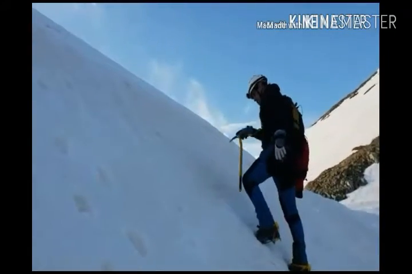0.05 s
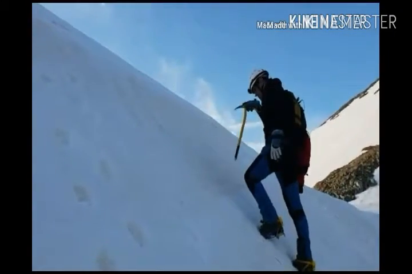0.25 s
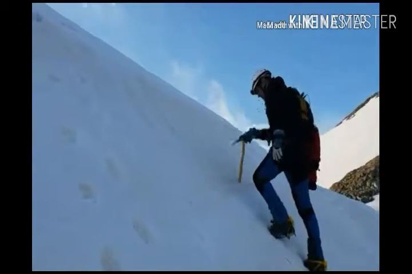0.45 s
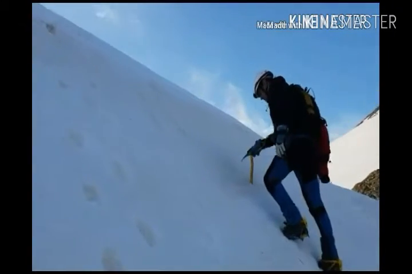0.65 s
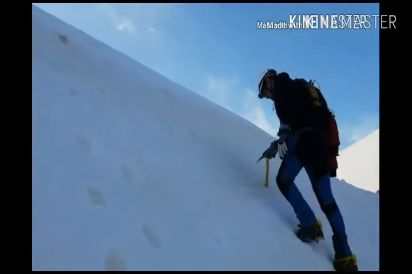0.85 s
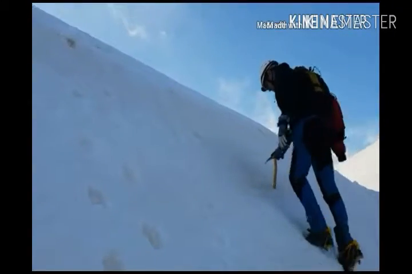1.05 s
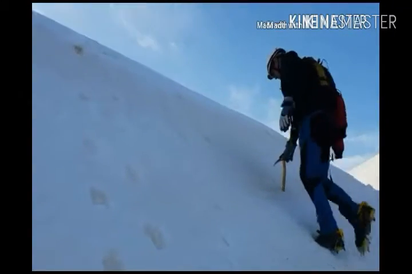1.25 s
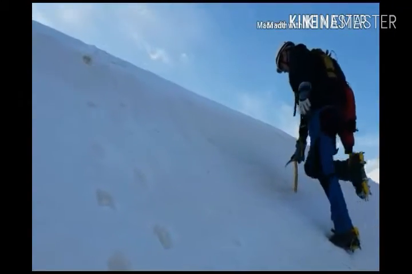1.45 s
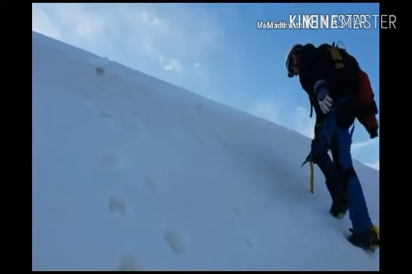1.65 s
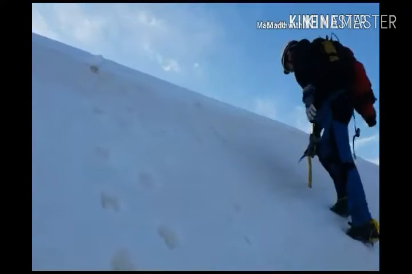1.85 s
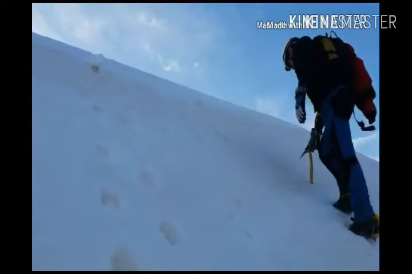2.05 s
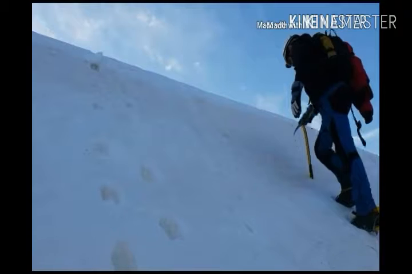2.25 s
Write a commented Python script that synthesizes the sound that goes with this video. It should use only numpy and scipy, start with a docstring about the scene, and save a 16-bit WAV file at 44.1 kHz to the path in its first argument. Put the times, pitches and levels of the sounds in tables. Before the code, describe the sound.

Crampons crunch and scrape on firm snow as a climber steps upward. A few short metal clacks from spikes and an ice axe come early, then softer rubbing, crust snaps and dull steps. Wind lightly buffets the close microphone.

```python
"""On an open slope of firm snow, a climber moves upward. Gritty rubbing, like a glove or sleeve close
to the microphone, has a dull body, a crunch and a fine hiss. Crampons (boot spikes) and an axe clack
with short rings that the snow damps, and bits of crust snap. Steps, knocks and a pop of wind thud softly.
Wind buffets the two microphone ports separately; the open slope gives no echo."""
import sys
import numpy as np
from scipy import signal
from scipy.fft import rfft, irfft
from scipy.io import wavfile

SR = 44100
rng = np.random.default_rng(int(sys.argv[2]) if len(sys.argv) > 2 else 0)


def to_wav(s):
    """Save 16-bit WAV."""
    ch = np.atleast_2d(s).T  # columns
    pcm = np.round(np.clip(ch, -1, 1) * 32767)  # PCM
    wavfile.write(sys.argv[1], SR, pcm.astype(np.int16))


N = 105840  # 2.4 seconds

SLIP_HZ, BODY_ROUGH_DB, HISS_ROUGH_DB = 169.6, 2, 1.9  # how fast and how much the rubbing jerks
FLICKER_HZ, FLICKER_DB = 890.4, 1.5
GRIT_PER_S, GRIT_SPREAD_DB, GRIT_DB = 320, 2, -9
RELEASE_S, CRUNCH_RING_DB = 0.013, -15.5
BODY_LIKENESS, CRUNCH_LIKENESS = 0.85, 0.047  # 1 means the same in both ears, 0 unrelated
# The tone of a rub's three parts. Each row: frequency in Hz, relative level in dB.
BODY_TONE = [(60, -8.5), (150, 0.5), (300, 1), (550, 2), (850, 3), (1200, 2), (1800, -7), (3000, -38),
             (6000, -18)]
CRUNCH_TONE = [(400, -30.5), (900, -26), (1400, 1), (1800, 6.5), (2400, 4.5), (3000, 3), (3600, 5),
               (4400, 4.5), (5200, 0.5), (7000, -7), (10000, -28), (16000, 0.5)]
HISS_TONE = [(1000, -45), (3000, -46), (5500, -1), (7500, 3), (9500, -2), (12000, 3.5), (15000, -2.5),
             (17000, 1)]
# Rubs and scrapes. Each row: start, length and rise time in seconds, fade over the length in dB,
# levels of body, crunch and hiss in dB, pan of the crunch (left minus right) in dB.
RUBS = [ (0.139, 0.08, 0.0049, -1, -51.5, -44, -46.5, -9),
        (0.228, 0.05, 0.019, 4, -37.5, -28.5, -28.5, -9.5), (0.271, 0.076, 0.0055, 3, -38.5, -33, -31, -4),
        (0.34, 0.08, .005, 3.5, -54.5, -42, -42, -7), (0.437, 0.079, .01, 1.5, -75, -59, -55, -6),
        (0.5264, 0.014, 0.0064, 3.5, -47.5, -26.5, -26, -2.5),
        (0.556, 0.057, 0.0051, 6.5, -52.5, -31, -34, -1.5),
        (0.634, 0.092, 0.0058, 6.5, -49, -42.5, -42.5, -7), (0.721, 0.19, 0.0037, 8.5, -53, -43.5, -46, -8),
        (0.863, 0.16, 0.0037, 0.5, -53, -45, -44, -7), (0.947, 0.13, 0.03, 2.5, -42, -39.5, -43, -5),
        (1.082, 0.048, 0.018, 7, -37.5, -34, -38.5, -6.5), (1.13, 0.13, .005, 1.5, -52.5, -50.5, -51, -4),
        (1.197, 0.028, 0.0064, 1.5, -42, -38.5, -38, -6), (1.253, 0.039, .004, -0.5, -48, -41, -41, -7),
        (1.293, 0.17, 0.018, 4.5, -49.5, -44, -46.5, -7),
        (1.468, 0.015, 0.0027, 1.5, -43.5, -29, -33.5, -16),
        (1.489, 0.036, 0.0047, -2.5, -46.5, -38, -38.5, -4),
        (1.537, 0.15, 0.0024, 5.5, -43.5, -36, -39.5, -5.5),
        (1.708, 0.027, 0.0074, -0.5, -40, -35.5, -33.5, -3.5),
        (1.739, 0.073, 0.0046, 8, -44, -40.5, -37.5, -3.5), (1.799, 0.078, 0.011, 6, -41, -39.5, -39, -4.5),
        (1.916, 0.068, 0.014, 0.5, -54, -45, -51.5, -19), (2.002, 0.077, 0.0071, 15.5, -50.5, -51, -68, -6),
        (2.153, 0.16, 0.024, 3.5, -69.5, -52.5, -51, -8)]


def rubbing(t):
    """Gritty, jerky rubbing close to the microphone, like a glove or sleeve, with a faint metal ring."""
    body_power = crunch_power = hiss_power = 0
    for start, length, rise, fade_db, body_db, crunch_db, hiss_db, pan_db in RUBS:
        age = np.maximum(t - start, 0)
        fade = undb(-fade_db * np.minimum(age / length, 1))
        release = np.exp(-np.maximum(age - length, 0) / RELEASE_S)
        envelope = np.minimum(age / rise, 1) * fade * release
        body_power += (undb(body_db) * envelope) ** 2
        crunch_power += (undb(crunch_db) * envelope * pan(pan_db)) ** 2
        hiss_power += (undb(hiss_db) * envelope) ** 2
    slip = wobble(SLIP_HZ)
    flicker = unit(undb(FLICKER_DB * wobble(FLICKER_HZ)))
    friction = crackle(CRUNCH_LIKENESS) * flicker
    grit = (rng.random(N) < GRIT_PER_S / SR) * undb(GRIT_SPREAD_DB * rng.standard_normal(N))
    friction += undb(GRIT_DB) * unit(grit * rng.standard_normal((2, N)))
    crunch = colour(friction * np.sqrt(crunch_power), CRUNCH_TONE)
    ring = unit(ringing(crackle(CRUNCH_LIKENESS), CRAMPON_MODES))
    steel = undb(CRUNCH_RING_DB) * ring * np.sqrt(crunch_power)
    body = crackle(BODY_LIKENESS) * np.sqrt(body_power) * flicker * undb(BODY_ROUGH_DB * slip)
    hiss = crackle(likeness=0) * np.sqrt(hiss_power) * undb(HISS_ROUGH_DB * slip)
    return colour(body, BODY_TONE) + crunch + steel + colour(hiss, HISS_TONE) * pan(db=-0.5)


def crackle(likeness, per_second=14000, spread_db=3.5):
    """Dense tiny clicks of uneven size; likeness is the share both ears hear."""
    shape = (3, N)  # shared, left, right
    happens = rng.random(shape) < per_second / SR
    size = undb(spread_db * np.minimum(rng.exponential(size=shape), 6))
    clicks = unit(happens * size * np.sign(rng.standard_normal(shape)))
    return np.sqrt(likeness) * clicks[0] + np.sqrt(1 - likeness) * clicks[1:]


def ringing(push, modes):
    """Pushed metal rings at its own frequencies, called modes."""
    return sum(undb(db) * signal.lfilter(*signal.iirpeak(hz, hz * ring_s / np.log(1000), fs=SR), push)
               for hz, db, ring_s in modes)


DAMP_S, FREE_SHARE, MUTE_S = 0.0032, 0.49, 0.026  # snow damps the ring fast, then mutes the share left
MAIN_MODE_HZ, CHATTER_HZ, CHATTER_DB = 3550, 450, 2.5
CRACK_DB, CRACK_S = -11, 0.0042
DETUNE = 0.003  # each contact loads the metal differently, shifting its modes by about this share
# The tone of the crack on contact. Each row: frequency in Hz, relative level in dB.
CRACK_TONE = [(200, -36), (900, -10.5), (1800, -2.5), (4000, -1), (5900, -6), (6700, -6), (7600, -7),
              (12000, -9.5), (16000, -17)]
# How the crampon, the axe and the axe's spike ring.
# Each row: frequency in Hz, relative level in dB, seconds to fade by 60 dB when ringing freely.
CRAMPON_MODES = [(670, -27.5, .12), (1115, -17, .099), (1530, -12, .06), (1990, -9, .09), (2400, -4, .11),
                 (2700, -8, .04), (3200, -6, .045), (3440, 2, .05), (3595, 4, .055), (4170, -2, .05),
                 (4310, -6, .055), (4490, -1, .06), (5720, -7, .035), (5940, -9, .035)]
AXE_MODES = [(666, -29, .14), (1102, -15, .1), (1730, 0, .055), (2085, -2, .07), (2300, -5, .06),
             (2800, -4, .046), (3470, -3, .035), (3590, 1, .05), (4300, -9, .05), (4495, 0, .075),
             (4588, 3, .07), (5700, -10, .05), (6090, -13, .045)]
SPIKE_MODES = [(1635, -10, .03), (2280, -6, .05), (2780, -8, .03), (3605, 4, .028), (4502, -16, .15),
               (5720, -13, .025), (6735, -10, .035)]
# When each one strikes. Each row: start in seconds, level in dB, rise time in seconds,
# treble tilt and focus on the main mode (both in dB per octave), pan in dB.
CRAMPON_HITS = [(.6025, -14, 0.0024, 6.5, 1, -3.5), (.6103, -14.5, 0.00095, -0.5, 4, -3.5),
                (.616, -14.5, 0.0031, -1, -1.5, -2), (1.4163, -33.5, .00087, -4, 0, -13)]
AXE_HITS = [(.7248, -27, 0.00056, 5.5, -10, 3), (.7268, -16.5, 0.0016, 6.5, 0, -10.5),
            (.738, -13.5, 0.0018, -8.5, 2, -0.5), (.882, -31.5, 0.0015, 1.5, -8.5, -11)]
SPIKE_HITS = [(.4597, -26.5, .0006, 5.5, -10, -8.5), (.4642, -19, 0.00063, -13, 20, -8)]


def metal_clacks(hits, modes):
    """Each contact makes a crack and rings the metal, which the snow quickly damps."""
    out = np.zeros((2, N))
    age = np.arange(SR // 10) / SR
    hz, mode_db, ring_s = np.array(modes, float).T[:, :, None]
    octaves_from_main = np.abs(np.log2(hz / MAIN_MODE_HZ))
    for start, db, rise, tilt_db, focus_db, pan_db in hits:
        gain = undb(mode_db + tilt_db * np.log2(hz) - focus_db * octaves_from_main)
        gain = gain / np.sqrt(np.sum(gain ** 2)) * np.exp(-np.log(1000) * age / ring_s)
        shifted_hz = hz * (1 + DETUNE * rng.standard_normal(hz.shape))
        phase = 2 * np.pi * (shifted_hz * age + rng.random((2, len(hz), 1)))
        onset = np.minimum(age / rise, 1)
        after = np.maximum(age - rise, 0)
        damping = FREE_SHARE + (1 - FREE_SHARE) * np.exp(-after / DAMP_S)
        envelope = onset * damping * np.exp(-(after / MUTE_S) ** 2)
        chatter = undb(CHATTER_DB * wobble(CHATTER_HZ)[:len(age)])
        strength = np.sqrt(np.mean(np.sum(gain ** 2, axis=0) * envelope ** 2))
        ring = strength * unit(np.sum(gain * np.sin(phase), axis=1) * envelope * chatter)
        noise = colour(rng.standard_normal((2, len(age))), CRACK_TONE)
        crack = noise * undb(CRACK_DB) * onset * np.exp(-after / CRACK_S)
        add(out, start, (ring + crack) * undb(db) * pan(pan_db))
    return out


# The tone of breaking crust. Each row: frequency in Hz, relative level in dB.
SNAP_TONE = [(150, -35.5), (700, -11), (1700, 3.5), (2800, 2.5), (3800, 7), (5500, -6), (8000, -2),
             (12000, -2.5), (16000, 1)]
# Snaps. Each row: start in seconds, level in dB, fade time in seconds, treble tilt in dB per octave.
SNAPS = [(.249, -25.5, 0.0057, -3), (.269, -23.5, .002, -7), (0.2747, -22, 0.0017, -6),
         (0.2825, -25, 0.0018, -8.5), (0.3068, -26, 0.0019, -4), (0.3162, -23.5, .001, -6),
         (0.3238, -25, 0.0016, -3), (0.341, -28, 0.00083, -7), (.3955, -27.5, 0.0016, 3),
         (0.4066, -27, 0.00077, 0.5), (.662, -29.5, 0.0016, -2), (0.7147, -29.5, .0012, -4),
         (0.8314, -30.5, 0.00089, 2), (0.872, -22.5, 0.0016, 3), (0.883, -41, 0.0037, 1),
         (.962, -34, 0.0015, -1), (1.095, -33, 0.0011, 0), (1.132, -34, 0.0012, -4),
         (1.26, -30.5, 0.0016, 1.5), (1.286, -28.5, 0.0011, -6), (1.4738, -18, .0007, -1),
         (1.482, -21.5, 0.00052, -2.5), (1.514, -27.5, 0.005, -0.5), (1.7139, -26.5, .0016, -3.5),
         (1.8087, -33, 0.0011, -5), (1.926, -34, 0.0022, -0.5), (1.9595, -27, 0.0016, -0.5),
         (1.975, -25, 0.0017, 1.5), (1.9843, -24.5, 0.00097, 0), (2.0254, -27, .0041, 0.5),
         (2.05, -35.5, 0.0025, 0), (2.064, -33.5, 0.0023, -0.5), (2.3813, -27.5, 0.00044, 2.5),
         (2.392, -35.5, 0.02, -1)]


def crust_snaps():
    """Single pieces of crust break in tiny bursts; thick ones sound duller."""
    out = np.zeros((2, N))
    age = np.arange(SR // 10) / SR
    for start, db, decay, tilt_db in SNAPS:
        burst = undb(db) * np.exp(-age / decay) * rng.standard_normal((2, len(age)))
        tone = [(hz, level + tilt_db * np.log2(hz)) for hz, level in SNAP_TONE]
        add(out, start, colour(burst, tone))
    return out * pan(db=-3)


# Soft thuds. Each row: start in seconds, level in dB, centre frequency in Hz, fade time in seconds.
THUDS = [(0.68, -36.5, 112, 0.0073), (0.871, -25.5, 870, 0.0032), (1.125, -36, 297, 0.01),
         (1.21, -34.5, 463, 0.011), (1.257, -24.5, 754, 0.003), (1.27, -43, 133, 0.018),
         (1.526, -34.5, 207, 0.019), (1.594, -45, 256, 0.017), (1.703, -33, 161, 0.015),
         (1.728, -43, 255, 0.013), (1.753, -35.5, 150, 0.0091), (1.846, -35.5, 140, 0.014),
         (2.28, -44, 554, 0.0054), (2.338, -41.5, 587, 0.0038)]


def soft_thuds(rise_s=0.0072, edge_db=-19):
    """Short, dull bursts of noise: boot steps, knocks and a pop of wind on the microphone."""
    out = np.zeros(N)
    age = np.arange(SR // 10) / SR
    for start, db, hz, decay in THUDS:
        band = [(hz / 4, edge_db), (hz / np.sqrt(2), 0), (hz * np.sqrt(2), 0),
                (hz * 4, edge_db), (hz * 16, -60)]
        envelope = np.minimum(age / rise_s, 1) * np.exp(-age / decay)
        thud = unit(envelope * colour(rng.standard_normal(len(age)), band))
        add(out, start, undb(db) * np.sqrt(np.mean(envelope ** 2)) * thud)
    return out


# The tone of the wind's rumble and the air's hiss. Each row: frequency in Hz, relative level in dB.
WIND_TONE = [(12, -19), (28, -3.5), (45, -5.5), (70, 0.5), (110, -5.5), (170, -18), (300, -40), (800, -69),
             (3000, -70)]
AIR_TONE = [(30, 20), (150, 3.5), (500, 1), (1200, -1.5), (3800, 0.5), (6000, -4), (12000, -2.5),
            (16000, -4.5)]
# Wind pressure on each microphone port. Each row: time in seconds, level in dB.
GUSTS_LEFT = [(0, -53.5), (.21, -58.5), (.28, -41), (.42, -48.5), (.5, -60), (.6, -43), (.65, -51),
              (.685, -33), (.73, -54), (1.03, -49.5), (1.39, -57.5), (1.455, -32.5), (1.5, -50),
              (1.72, -51), (2.02, -64), (2.2, -72), (2.3, -46), (2.4, -84)]
GUSTS_RIGHT = [(0, -82), (.3, -56), (.5, -71), (.68, -46), (.88, -61), (.96, -35.5), (1.02, -57),
               (1.39, -57), (1.5, -45), (1.57, -33), (1.62, -36), (1.66, -47.5), (1.77, -35), (1.81, -46.5),
               (1.86, -32.5), (1.91, -58), (1.952, -33.5), (2.02, -48.5), (2.17, -48), (2.4, -73)]


def wind(t, air_db=-55.5):
    """Gusts rumble on each port separately, over a faint steady hiss of air."""
    gusts = np.array([undb(np.interp(t, *np.array(port).T)) for port in (GUSTS_LEFT, GUSTS_RIGHT)])
    rumble = unit(colour(rng.standard_normal((2, N)), WIND_TONE))
    air = undb(air_db) * colour(crackle(likeness=0.31), AIR_TONE) * pan(db=-0.87)
    return gusts * rumble + air


def undb(db):
    """Turn decibels into a number to multiply by."""
    return 10 ** (np.asarray(db) / 20)


def unit(x):
    """Scale to an average power of 1."""
    return x / np.sqrt(np.mean(x ** 2, axis=-1, keepdims=True))


def pan(db):
    """Make the left side db louder than the right, keeping the total power."""
    gains = undb(np.array([[db], [-db]]) / 2)
    return gains / np.sqrt(np.mean(gains ** 2))


def colour(x, points):
    """Shape the tone along (Hz, dB) points; white noise keeps its power."""
    n = x.shape[-1]
    hz, db = np.array(points, float).T
    grid_hz = np.maximum(np.arange(n + 1) * SR / (2 * n), 1)
    gain = unit(undb(np.interp(np.log(grid_hz), np.log(hz), db)))
    # Fold the filter forward in time, so nothing sounds before its cause.
    cepstrum = irfft(np.log(gain))
    cepstrum[1:n] *= 2
    cepstrum[n + 1:] = 0
    return irfft(rfft(x, 2 * n) * np.exp(rfft(cepstrum)))[..., :n]


def wobble(rate_hz):
    """Glide between random values, with a spread of 1."""
    return unit(np.interp(np.arange(N) / SR * rate_hz, np.arange(N), rng.standard_normal(N)))


def add(out, start, sound):
    """Mix a short sound in at its start time."""
    i = int(start * SR)
    out[..., i:i + sound.shape[-1]] += sound[..., :N - i]


def scene():
    """Rubbing, metal, crust, thuds and wind together."""
    t = np.arange(N) / SR
    metal = metal_clacks(CRAMPON_HITS, CRAMPON_MODES)
    metal += metal_clacks(AXE_HITS, AXE_MODES)
    metal += metal_clacks(SPIKE_HITS, SPIKE_MODES)
    return wind(t) + rubbing(t) + soft_thuds() + crust_snaps() + metal


def record(dry):
    """Cut off the very highest treble."""
    top_hz = 15650
    return signal.sosfilt(signal.ellip(10, .2, 70, top_hz, fs=SR, output="sos"), dry)


dry = scene()
out = record(dry)
to_wav(out)
```